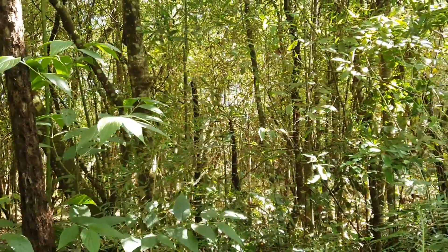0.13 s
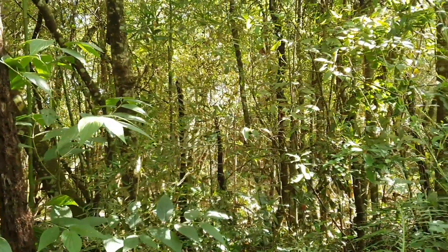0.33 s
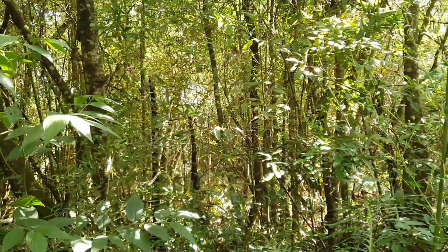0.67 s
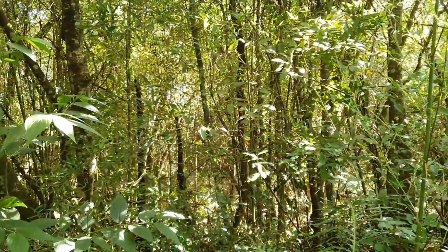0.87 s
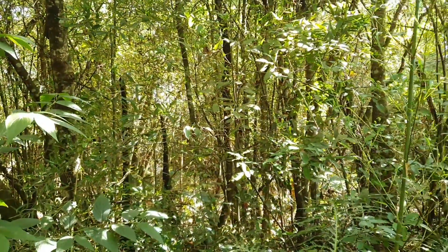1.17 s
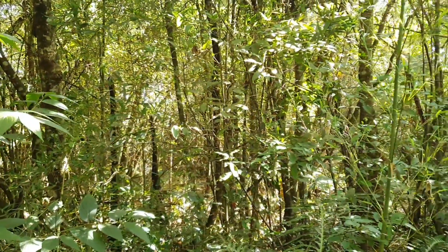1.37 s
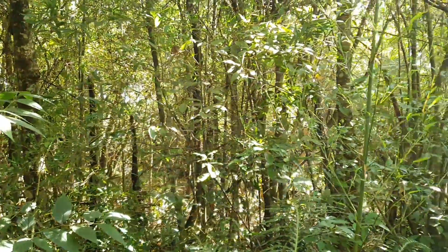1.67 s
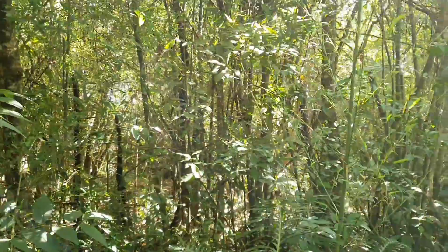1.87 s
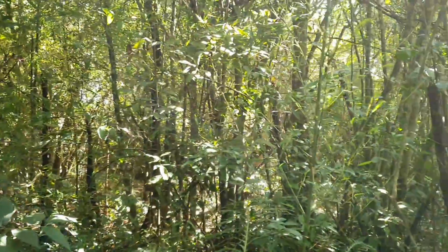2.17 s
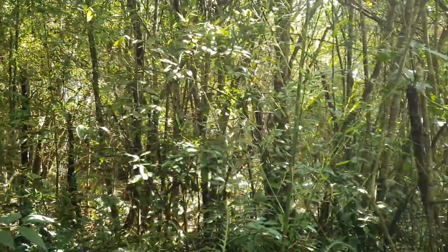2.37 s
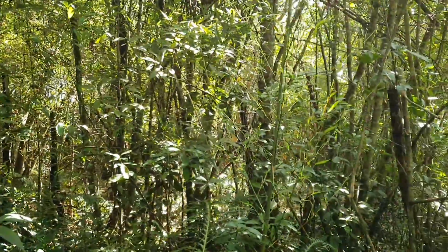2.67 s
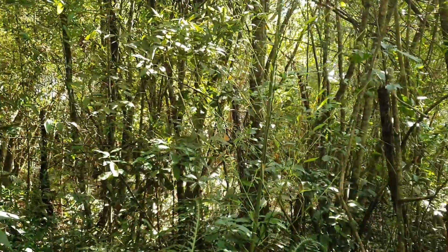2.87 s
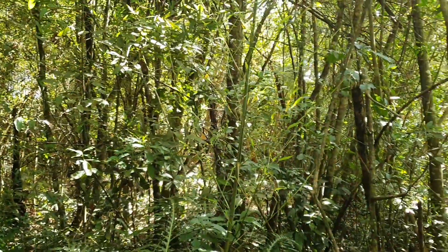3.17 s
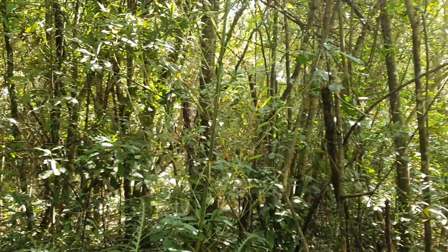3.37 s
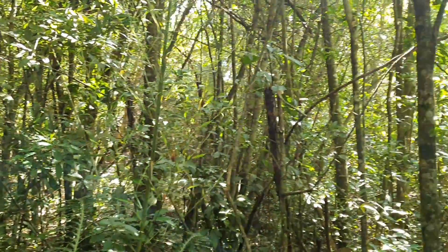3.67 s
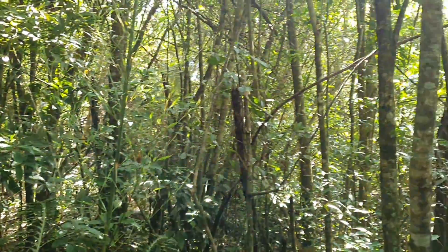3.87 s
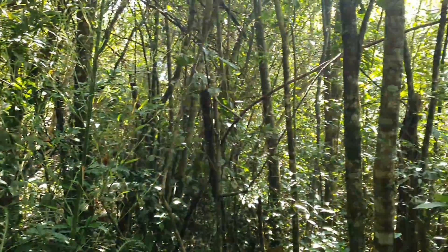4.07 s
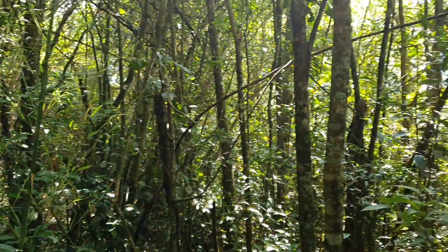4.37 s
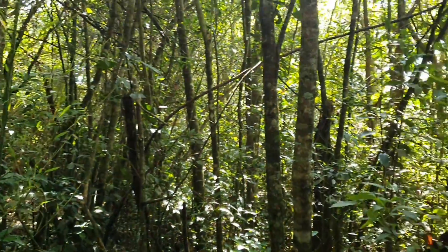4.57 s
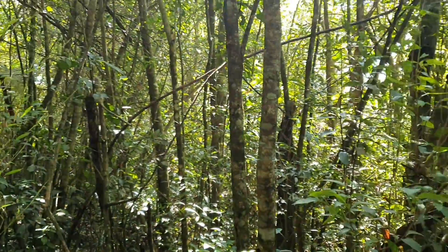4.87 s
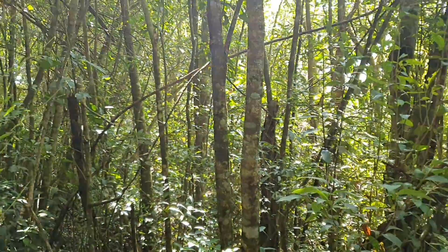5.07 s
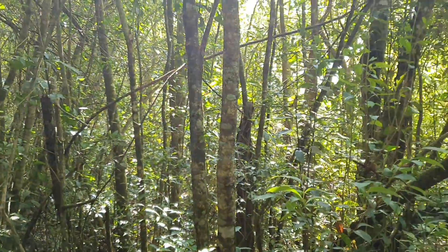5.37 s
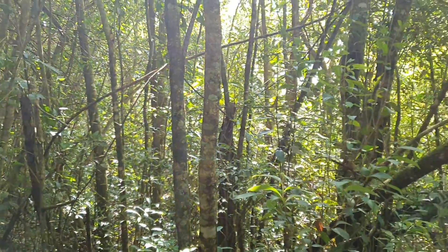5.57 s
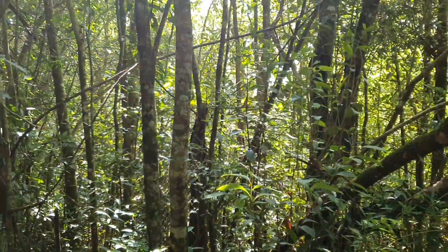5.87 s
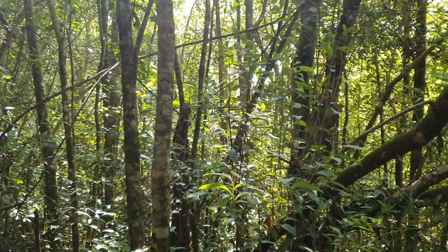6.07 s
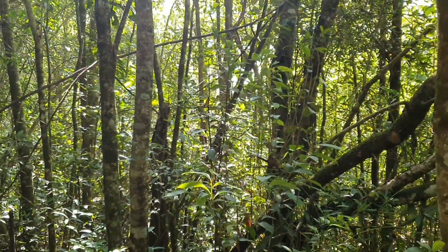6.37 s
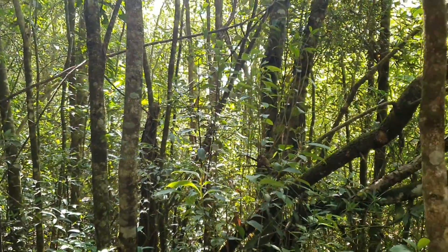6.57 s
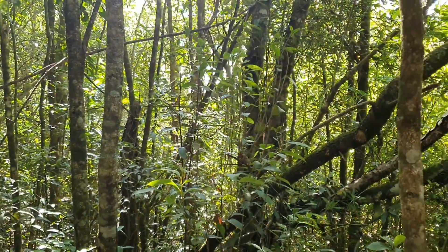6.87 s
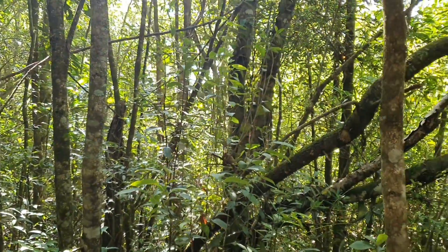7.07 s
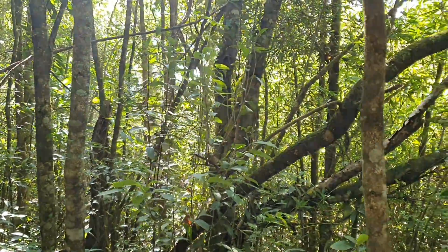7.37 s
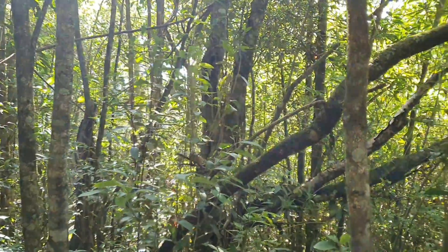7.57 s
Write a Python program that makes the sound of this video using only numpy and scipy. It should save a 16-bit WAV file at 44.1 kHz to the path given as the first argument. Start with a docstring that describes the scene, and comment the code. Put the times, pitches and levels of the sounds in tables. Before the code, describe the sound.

In dense woodland, a songbird sings a string of clear slurred and trilled whistles, each with a short echo off the trees. Faint insects whine high and steady behind it, and dry leaves rustle softly underfoot. Just past halfway a twig snaps twice, sharp and loud, close to the microphone. The song ends there, leaving faint distant bird calls, the insects and a soft hiss.

```python
"""Dense woodland. A thrush sings twelve slurred and trilled whistles; the trunks scatter each note
into a short tail. Someone shifts on the leaf litter, and a dry twig snaps twice close to the
microphone. Other birds call farther off, insects whine near 5 kHz and a cricket chirps,
over soft hiss, the hush of far leaves and a low rumble."""
import sys
import numpy as np
from scipy import signal
from scipy.fft import rfft, irfft, next_fast_len
from scipy.io import wavfile
from scipy.ndimage import uniform_filter1d, map_coordinates

SR = 44100
rng = np.random.default_rng(int(sys.argv[2]) if len(sys.argv) > 2 else 0)


def waveform_to_disk(signal):
    """Save audio, clipped to [-1, 1], as 16-bit WAV at the path in sys.argv[1]."""
    frames = np.transpose(np.atleast_2d(signal))
    scaled = np.clip(frames, -1, 1) * 32767
    samples = np.round(scaled).astype(np.int16)
    wavfile.write(sys.argv[1], SR, samples)


N = 340893


def thrush(lag_s=.00042):
    """The song reaches the left port first; each note finds its own paths through the trees."""
    # One list a note, of one or two slurs. Each row: start, bend in and bend out in seconds,
    # start, turn, end pitch and opening flick in Hz, relative level and swell in dB.
    whistles = [
        [(.303, .09, .025, 2290, 2070, 2010, 520, -31, -4), (.415, .085, .152, 2010, 1715, 2400, 0, -30.5, 0)],
        [(.815, .08, .075, 3400, 2778, 2795, 0, -31.5, -2)],
        [(1.07, .12, .065, 3050, 2110, 2440, 0, -31, 1)],
        [(1.46, .065, .045, 1624, 1755, 1840, 0, -37, 11), (1.572, .05, .158, 2235, 2250, 2470, 0, -36, 0)],
        [(1.992, .135, .14, 2150, 1712, 1700, -450, -33, -2)],
        [(2.398, .045, .063, 2050, 2035, 1885, 300, -33, 12), (2.508, .055, .03, 2330, 2160, 2115, 330, -33, 5)],
        [(2.798, .055, .037, 1900, 1612, 1750, 1400, -33, -3), (2.89, .075, .07, 1760, 2036, 1950, 0, -31, 1)],
        [(3.533, .03, .057, 2440, 2410, 2300, 950, -31, 0), (3.62, .1, .19, 2306, 2000, 2590, 0, -32, 3)],
        [(4.085, .045, .095, 3460, 3080, 3150, 0, -30.5, 4)],
        [(4.31, .125, .01, 3120, 2280, 2280, 0, -32, 1), (4.425, .052, .032, 2280, 2498, 2494, 0, -29.5, 2)],
    ]
    # Trilled notes. Each row: trill rate in Hz, then the columns of a slur.
    trills = [(42.8, -.047, .147, .032, 2200, 2085, 2130, 0, -30, -4),
              (45.7, 3.135, .085, .135, 3180, 2595, 2575, 0, -34, 9)]
    song = np.zeros((2, N))
    flutter = .0042 * wobble(150)
    blur_rad = .4 * wobble(900)  # phase jitter of the overtones
    notes = [(slurs[0][0], note(slurs, flutter, blur_rad)) for slurs in whistles]
    notes += [(row[0], note([row], flutter, blur_rad, trill_hz)) for trill_hz, *row in trills]
    for s, tone in notes:
        voice = np.pad(tone, (0, SR // 2))[None]
        direct = filtered(voice, lambda hz: np.exp(1j * np.pi * hz * lag_s * np.array([[1], [-1]])))
        add(song, s, amp(-4.8) * direct + amp(-3.3) * woods(voice, early_db=7.5, early_t60_s=.14))
    return song


def note(slurs, flutter, blur_rad, trill_hz=0, swing_hz=160, throb_db=3, attack_s=.03, release_s=.018):
    """A near-pure tone glides through its slurs; a trill swings the pitch, loudest at each dip."""
    # Overtone strength. Each row: frequency in Hz, level in dB re the fundamental.
    overtone_db = [(3400, -48), (5000, -48), (6600, -40), (7500, -54), (8400, -38), (9300, -49),
                   (11300, -56), (12300, -40), (13100, -62)]
    # The voice is strongest mid-range. Each row: pitch in Hz, gain in dB.
    voice_db = [(1600, -9), (1750, -7), (2000, 0), (2400, 0), (2800, 0), (3100, -2.5), (3400, -10)]
    start_s, end_s = slurs[0][0], sum(slurs[-1][:3])
    t = np.arange(int((end_s - start_s) * SR)) / SR
    controls = np.zeros((2, len(t)))
    for s, *shape in slurs:
        begun = t >= s - start_s
        controls[:, begun] = slur(t[begun] - (s - start_s), *shape)
    hz, db = uniform_filter1d(controls, size=300)
    swing = np.sin(2 * np.pi * trill_hz * t)
    envelope = np.minimum(t / attack_s, 1) * np.minimum((t[-1] - t) / release_s, 1)
    envelope *= amp(db + along(voice_db, hz) - throb_db * swing)
    hz = hz * (1 + flutter[:len(t)]) + swing_hz * swing
    phase = 2 * np.pi * np.cumsum(hz) / SR
    tone = np.sin(phase)
    for k in range(2, 8):
        gain = amp(along(overtone_db, k * hz)) * (k * hz < SR / 2)
        tone += gain * np.sin(k * phase + blur_rad[:len(t)])
    return np.sqrt(2) * envelope * tone


def slur(age_s, in_s, out_s, start_hz, turn_hz, end_hz, flick_hz, db, swell_db, flick_s=.009):
    """Pitch and level of a slur: a flick, then near-parabolic bends into a turning pitch and out."""
    bend_in = np.clip(1 - age_s / in_s, 0, 1) ** 1.9
    bend_out = np.clip((age_s - in_s) / out_s, 0, 1) ** 1.9
    hz = turn_hz + (start_hz - turn_hz) * bend_in + (end_hz - turn_hz) * bend_out
    hz += flick_hz * np.exp(-age_s / flick_s)
    return hz, db + swell_db * (age_s / (in_s + out_s) - .5)


def twigs(thud_t60_s=.077):
    """Each fracture is a sharp release and milliseconds of tearing fibres; the step thuds on the soil."""
    # Fractures and ticks. Each row: start in seconds, relative level in dB, t60 in seconds, treble in dB.
    snaps = [(1.817, -45, 0.0058, -21), (2.7397, -35.5, 0.012, 6), (2.906, -40, .02, -15),
             (3.5558, -45, 0.0047, -15), (4.355, -44, .004, 10), (4.4398, -8, 0.0093, 5.5),
             (4.5308, -11, 0.022, -2.5), (4.537, -15, 0.021, 2), (4.768, -62, 0.0032, -3),
             (4.807, -55.5, 0.005, -9), (6.034, -47.5, 0.0063, -10), (6.051, -54, .005, -13),
             (6.076, -53, 0.0052, -9), (7.074, -49, 0.0088, -19)]
    # Twig spectrum. Each row: frequency in Hz, density in dB.
    twig_spectrum = [(100, -25.5), (250, -14), (520, -14.5), (900, -21), (1300, -11.5), (2200, 1.5),
                     (3050, -4), (3600, 0), (4300, -3.5), (5900, -11.5), (8300, -12.5), (9700, -18.5),
                     (11200, -13), (15000, -23.5)]
    # Soil and wood knocked by a step. Each row: start in seconds, settled pitch in Hz, level in dB.
    thuds = [(0.248, 158, -49.5), (4.446, 137, -34.5), (4.533, 150, -34.5), (7.074, 700, -53)]
    cracks, soil = np.zeros((2, N)), np.zeros((2, N))
    t = np.arange(SR // 8) / SR
    wood = impulse(twig_spectrum)
    for s, db, t60_s, treble_db in snaps:
        fibres = .5 * rng.standard_normal(len(t)) + .91 * rng.standard_normal((2, len(t)))
        fibres *= amp(-60 * t / t60_s)
        fibres[[0, 1], [0, 3]] = 5  # the release reaches the left port 3 samples early
        crack = signal.fftconvolve(fibres, wood[None], axes=1)
        crack = filtered(crack, lambda hz: amp(along([(2500, .004), (9000, treble_db)], hz)))
        add(cracks, s, amp(db - 2) * crack)
    for s, hz, db in thuds:
        phase = 2 * np.pi * hz * t * (1 + .5 * np.exp(-t / .015))
        add(soil, s, amp(db - 60 * t / thud_t60_s) * np.sin(phase))
    return cracks + soil + amp(-8.5) * woods(cracks, early_db=23.5, early_t60_s=.22)


def litter():
    """Dry leaves crackle under shifting weight, and a foot scuffs through them."""
    # Spectra of leaves and sole. Each row: frequency in Hz, density in dB.
    leaf_spectrum = [(300, -9), (1500, 1), (3000, 8), (4500, 7.5), (7000, -3), (10000, -9), (15000, -11.5)]
    sole_spectrum = [(300, -20), (700, -2), (1100, -6), (2100, 3), (3200, -8), (5000, -13.5), (9000, -21),
                     (15000, -38)]
    # Weight shifts and foot strokes. Each row: peak time and half-width in seconds, level in dB.
    rustles = [(.3, .4, -67), (.61, .06, -60), (2.67, .04, -59), (2.79, .035, -53), (2.92, .04, -55),
               (3.8, .17, -53), (4.35, .08, -60), (4.54, .11, -46.5), (7.055, .06, -56.5), (7.6, .04, -66)]
    scuffs = [(2.91, .03, -57), (7.02, .12, -64.5), (7.085, .025, -54), (7.36, .14, -69), (7.6, .04, -58)]
    crackle = unit(rush(leaf_spectrum, patchy_db=1.5) * amp(2.8 * wobble(700)))
    scuff = unit(rush(sole_spectrum, patchy_db=1.5) * amp(2.5 * wobble(300)))
    return swells(rustles) * crackle + swells(scuffs) * scuff


def other_birds():
    """The farther the caller, the more of it arrives as scatter."""
    # Whistlers. Each row: start and length in seconds, start, middle, end pitch in Hz, relative dB.
    near_calls = [(2.222, 0.062, 1110, 1540, 1300, -48), (3.1, 0.1, 5300, 6100, 6900, -57.5),
                  (5.508, .09, 1105, 1562, 1090, -48)]
    far_calls = [ (.06, .06, 5870, 6270, 6740, -57), (1.63, .05, 2600, 2940, 3220, -52.5),
                 (3.97, .39, 445.5, 426.6, 459, -58), (4.8, .33, 830, 676, 451, -67.5),
                 (5.15, .26, 2284, 2105, 2060, -64.5), (5.41, .23, 2880, 2510, 2420, -61),
                 (5.56, .089, 7100, 7220, 7250, -59), (5.66, .23, 1544, 1951, 2180, -66),
                 (6.23, .12, 1802, 1774, 1770, -78), (6.49, .063, 2550, 2455, 2350, -61),
                 (6.55, .11, 1950, 1920, 1900, -72), (6.78, .22, 1320, 1255, 914, -63),
                 (6.96, .26, 950, 699, 649, -62), (7.3, .17, 1957, 2127, 2220, -67)]
    # One bird's hoarse falling call. Each row: start and length in seconds, relative level in dB.
    downslurs = [(1.43, .089, -55), (2.01, .18, -57), (2.26, .17, -61.5), (5.59, .073, -52.5),
                 (7.52, .09, -51)]
    # Its start, middle and end pitch in Hz.
    downslur_hz = (5350, 4150, 3350)
    # A small bird's run of thin notes: starts in seconds.
    tsip_starts_s = [5.44, 5.64, 5.84, 6.02, 6.2]
    falling = [(s, length_s, *downslur_hz, db) for s, length_s, db in downslurs]
    tsips = [(s, .1, 6580, 6380, 6130, -62.3) for s in tsip_starts_s]
    near = calls(near_calls, rough=.03)
    far = calls(far_calls + falling + tsips, rough=.085)
    return near + amp(-11) * far + woods(amp(-2.5) * near + far, early_db=-4.5, early_t60_s=.25)


def calls(rows, rough):
    """Short whistles, each gliding through three pitches; high, steep ones are hoarser."""
    track, flutter = np.zeros((1, N)), rough * wobble(900)
    for s, length_s, start_hz, middle_hz, end_hz, db in rows:
        progress = np.linspace(0, 1, int(length_s * SR))
        hz = np.polyval(np.polyfit([0, .5, 1], [start_hz, middle_hz, end_hz], 2), progress)
        hoarseness = np.clip((start_hz - end_hz) ** 2 / 1800 ** 2 + min(middle_hz, 2500) / 5000, 0, 1)
        hz *= 1 + hoarseness * np.roll(flutter, -int(s * SR))[:len(hz)]
        add(track, s, amp(db) * np.sin(np.pi * progress) * np.sin(2 * np.pi * np.cumsum(hz) / SR))
    return track


def chatter():
    """A distant bird's harsh chatter: flickering noise that stops early on."""
    # Loudness contour. Each row: time in seconds, relative level in dB.
    rasp_db = [(0, -44), (.3, -53), (.6, -51.5), (.8, -54.5), (1, -48), (1.25, -46), (1.36, -61.5),
               (1.45, -72)]
    # Chatter spectrum. Each row: frequency in Hz, density in dB.
    rasp_spectrum = [(600, -36.5), (770, -7.5), (950, -35.5), (1250, -19.5), (1500, -7.5), (1800, -12.5),
                     (2300, -1.5), (2600, -3), (3000, 4.5), (3350, -1.5), (3750, -2.5), (4600, -8.5),
                     (6500, -20), (9000, -37.5)]
    rasp = amp(curve(rasp_db) - 1 + 1.6 * wobble(20)) * rush(rasp_spectrum, patchy_db=4)
    return rasp * (np.arange(N) / SR < rasp_db[-1][0])


def insects():
    """Many wings blur into one narrow, slowly swelling whine."""
    # Loudness contour. Each row: time in seconds, relative level in dB.
    whine_db = [(0, -58.5), (.9, -61), (2, -62), (3.2, -60), (3.8, -60.5), (4.3, -59), (5, -67.5),
                (5.6, -59.5), (6.1, -67), (6.8, -63.5), (7.4, -64), (7.73, -61)]
    # Whine spectrum. Each row: frequency in Hz, density in dB.
    whine_spectrum = [(4300, -50.5), (4900, -14.5), (5150, -2), (5400, 1), (5560, -3), (5720, -19),
                      (6800, -19), (7400, -47.5), (9000, -46)]
    return amp(curve(whine_db) + 2 + .8 * wobble(9)) * rush(whine_spectrum, patchy_db=2)


def cricket(period_s=.131, chirp_hz=5100, length_s=.045):
    """A nearer insect repeats a short, slightly rising chirp."""
    # Chirp runs. Each row: centre of the first chirp in seconds, chirp count, level in dB.
    runs = [(.93, 6, -56), (2.36, 3, -57.5), (2.88, 2, -55)]
    track, t = np.zeros((1, N)), np.arange(int(length_s * SR)) / SR
    phase = 2 * np.pi * chirp_hz * t * (1 + .0049 * (t / length_s - 1))
    chirp = np.sin(np.pi * t / length_s) * np.sin(phase)
    for s, count, db in runs:
        for k in range(round(count)):
            add(track, s + k * period_s - length_s / 2, amp(db) * chirp)
    return track + amp(-1.5) * woods(track, early_db=3.5, early_t60_s=.2)


def air(rumble_floor_db=-71.5, canopy_db=-77):
    """Soft forest hiss and the steady hush of far leaves over a low, surging rumble."""
    # Spectra of the three layers. Each row: frequency in Hz, density in dB.
    rumble_spectrum = [(15, -35.5), (28, -17.5), (42, -4), (65, 3), (95, -4), (120, -12), (170, -28.5),
                       (300, -61.5)]
    hiss_spectrum = [(40, -8.5), (130, -1.5), (350, 2), (700, -3), (1100, -12.5), (2200, -13), (3500, -18),
                     (5500, -20.5), (8000, -17), (15000, -26)]
    canopy_spectrum = [(300, -18), (700, -1), (1100, -5), (2100, 0), (3200, -5.5), (4500, -9), (6000, -14),
                       (15000, -32)]
    # Rumble swells. Each row: peak time and half-width in seconds, level in dB.
    surges = [(.25, .3, -64), (1.4, .06, -64), (1.72, .07, -58), (2.18, .22, -59), (3.12, .06, -58.5),
              (3.47, .04, -50.5), (4.1, .35, -64), (4.54, .11, -51.5), (7.62, .24, -59.5)]
    # Hiss contour. Each row: time in seconds, level in dB.
    hiss_db = [(0, -68), (.9, -73.5), (2.2, -72.5), (2.9, -68), (3.7, -73), (4.45, -64), (4.9, -71.5),
               (5.5, -75), (6.7, -78), (7.73, -72)]
    rumble_gain = np.hypot(amp(rumble_floor_db), swells(surges)) * amp(wobble(10))
    rumble = rumble_gain * rush(rumble_spectrum, patchy_db=2.5)
    hiss = amp(curve(hiss_db)) * rush(hiss_spectrum, patchy_db=3)
    return rumble + hiss + amp(canopy_db) * rush(canopy_spectrum, patchy_db=2.5)


def woods(x, early_db, early_t60_s, onset_s=.0046):
    """Scatter from the trunks: a quick burst from the near ones, a longer tail from the rest."""
    # Tail decay. Each row: frequency in Hz, t60 in seconds.
    tail_t60_s = [(150, .25), (1000, 0.14), (2200, 0.58), (5000, 0.5), (12000, 0.43)]
    hz, t, bins = signal.stft(rng.standard_normal((2, SR)), SR, nperseg=256)
    decay = amp(-60 * t / along(tail_t60_s, hz)[:, None]) + amp(early_db - 60 * t / early_t60_s)
    decay *= 1 - np.exp(-t / onset_s)
    tail = signal.istft(bins * decay, SR, nperseg=256)[1]
    return signal.fftconvolve(x, tail / np.linalg.norm(tail[0]), axes=1)[:, :x.shape[-1]]


def rush(spectrum, patchy_db):
    """Stereo noise of rms 1 with patches of random gain."""
    # Stereo likeness. Each row: frequency in Hz, left-right correlation.
    likeness = [(60, .88), (300, 0.67), (700, 0.27), (1400, -0.089), (4000, -0.19), (7000, 0), (15000, 0)]
    bins = signal.stft(rng.standard_normal((2, N)), nperseg=512)[2]
    patches = uniform_filter1d(rng.standard_normal(bins.shape[1:]), size=4, axis=0)
    patches = uniform_filter1d(patches, size=12, axis=1)
    pair = signal.istft(bins * amp(patchy_db * unit(patches)), nperseg=512)[1][:, :N]

    def mid_side_gains(hz):
        angle = np.arccos(np.clip(along(likeness, hz), -1, 1)) / 2
        return amp(along(spectrum, hz)) * [np.cos(angle), np.sin(angle)]

    mid, side = filtered(pair, mid_side_gains)
    return unit(np.array([mid + side, mid - side]))


def swells(rows, power=1.6):
    """Gain over time of swells that rise and die away; power 1 is a cusp, 2 a bell."""
    t = np.arange(N) / SR
    return sum(amp(db) * np.exp(-np.abs((t - s) / width_s) ** power) for s, width_s, db in rows)


def amp(db):
    """Decibels to gain."""
    return 10 ** (np.asarray(db) / 20)


def unit(x):
    """Scale to rms 1."""
    return x / np.sqrt(np.mean(x ** 2) + 1e-20)


def along(points, hz):
    """Interpolate (Hz, value) points on a log axis."""
    knots_hz, values = np.transpose(points)
    return np.interp(np.log(hz + 1), np.log(knots_hz + 1), values)


def curve(points):
    """Interpolate (seconds, value) points at every sample."""
    return np.interp(np.arange(N) / SR, *np.transpose(points))


def wobble(rate_hz):
    """A smooth random curve, rate_hz knots a second."""
    knots = rng.standard_normal(int(N * rate_hz / SR) + 4)
    return map_coordinates(knots, [np.arange(N) * rate_hz / SR])


def filtered(x, response):
    """Filter x by a response given as a function of Hz."""
    size = next_fast_len(x.shape[-1] + SR // 4)
    return irfft(rfft(x, size) * response(np.fft.rfftfreq(size, 1 / SR)), size)[..., :x.shape[-1]]


def impulse(spectrum, size=1024):
    """The causal impulse response of a spectrum, energy 1."""
    cepstrum = irfft(np.log(amp(along(spectrum, np.fft.rfftfreq(size, 1 / SR)))))
    causal = 2 * cepstrum[:size // 2] * (np.arange(size // 2) > 0)
    response = irfft(np.exp(rfft(causal, size)))
    return response / np.linalg.norm(response)


def add(track, s, sound):
    """Mix a sound in at s seconds; it may already be under way at time 0."""
    start = round(s * SR)
    sound = sound[..., max(-start, 0):]
    part = track[:, max(start, 0):][:, :sound.shape[-1]]
    part += sound[..., :part.shape[-1]]


def scene():
    """Everything heard from among the trees."""
    return thrush() + other_birds() + chatter() + twigs() + litter() + insects() + cricket() + air()


def record(dry, ceiling=.85, top_hz=15450):
    """The two microphone ports differ in colour, the loudest crack clips, a band limit cuts the top."""
    # Port mismatch. Each row: frequency in Hz, left minus right in dB.
    ports_db = [(60, -3), (350, 0), (750, 0), (1300, -1), (1900, -6), (2350, -3.5), (2750, -4), (3150, -1),
                (4000, -3), (5300, 3.5), (8000, 7), (15000, 2.5)]
    coloured = filtered(dry, lambda hz: amp(along(ports_db, hz) * np.array([[.5], [-.5]])))
    clipped = np.clip(coloured, -ceiling, ceiling)
    return filtered(clipped, lambda hz: 1 / (1 + (hz / top_hz) ** 120))


dry = scene()
out = record(dry)
waveform_to_disk(out)
```